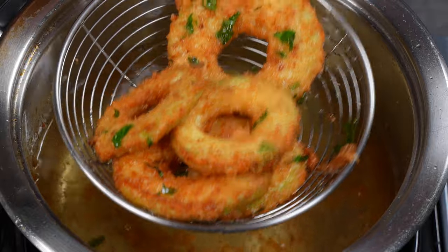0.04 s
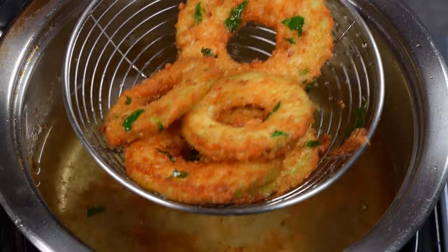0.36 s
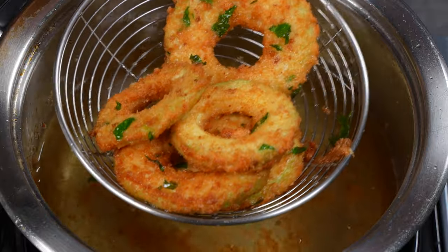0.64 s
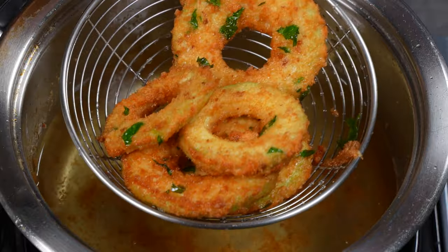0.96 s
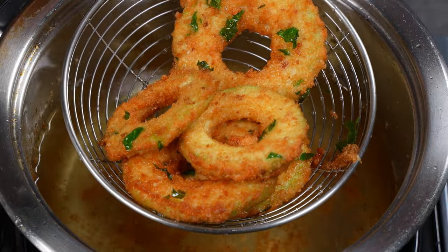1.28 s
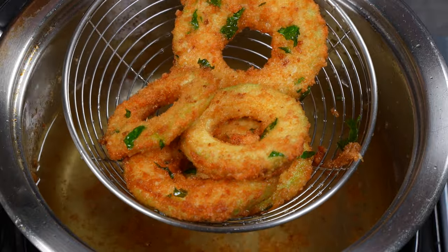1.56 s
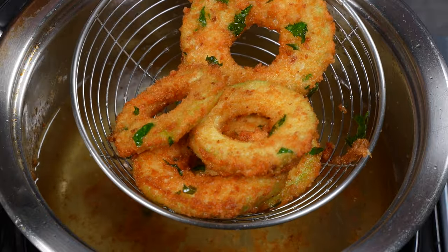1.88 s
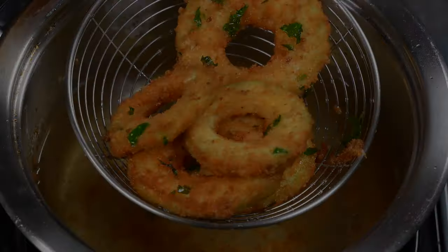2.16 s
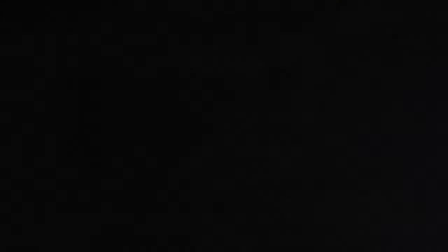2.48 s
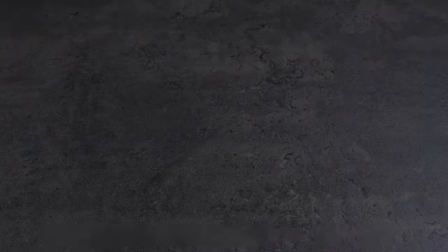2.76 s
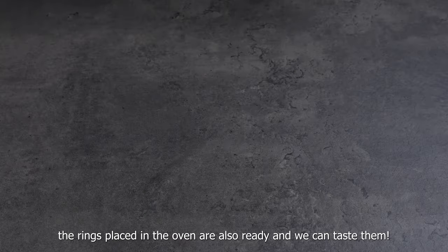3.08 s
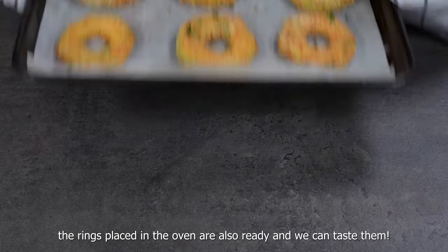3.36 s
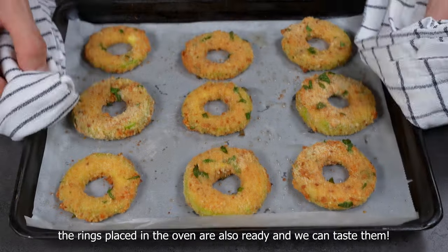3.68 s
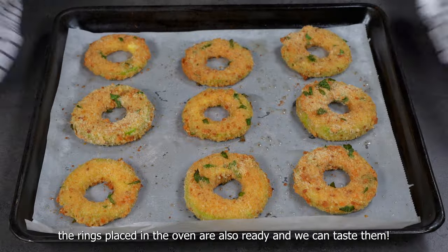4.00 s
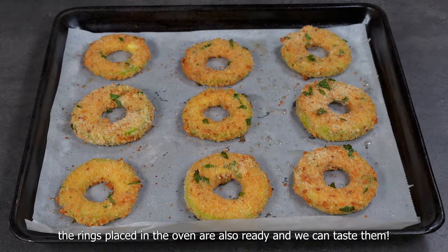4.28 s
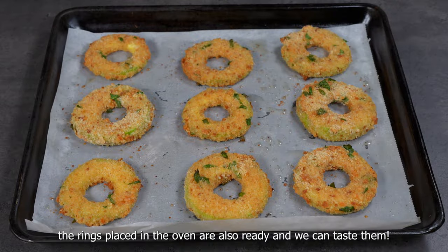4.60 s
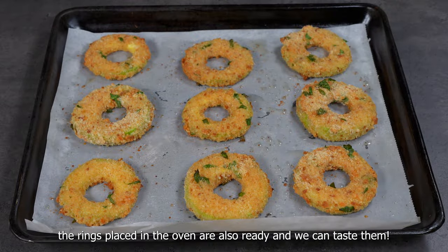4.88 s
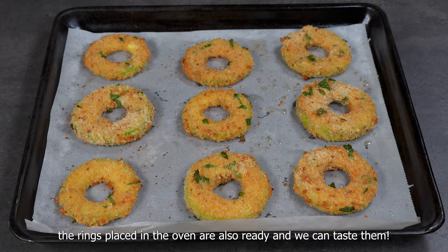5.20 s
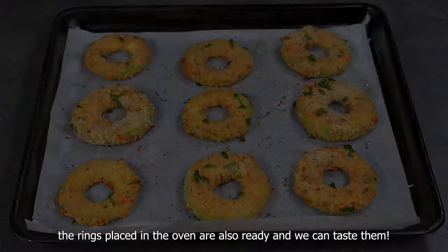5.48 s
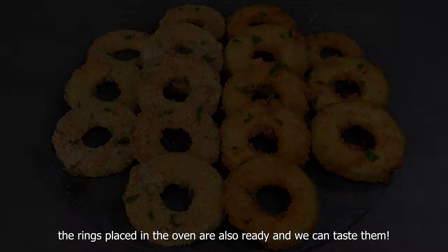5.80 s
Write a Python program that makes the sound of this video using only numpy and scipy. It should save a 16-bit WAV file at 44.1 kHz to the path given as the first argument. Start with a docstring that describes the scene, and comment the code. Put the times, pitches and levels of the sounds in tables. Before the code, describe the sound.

A fine, bright sizzle of frying oil comes first, dotted with pops and tiny pings from the pot. It stops abruptly and a low fan hum is barely heard. After a short paper rustle, a baking tray clangs down on a kitchen worktop, edge first and then flat, close and slightly distorted. Cloth rustles softly and baking paper ticks as the hum sinks away.

```python
"""First, oil fizzes in a steel pot under a lifted skimmer; water drops spit and ring the pot.
At 2.5 s it cuts to a quiet kitchen with a low fan hum. Baking paper crinkles as a lined tray comes
down with towels: one edge hits the counter at 3.7 s, and the tray drops flat a quarter second later.
Both blows overload the close microphone and ring on in the room.
Last, the towels rustle faintly and the hum sinks away."""
import sys
import numpy as np
from scipy import signal
from scipy.fft import rfft, irfft
from scipy.io import wavfile

SR = 44100
rng = np.random.default_rng(int(sys.argv[2]) if len(sys.argv) > 2 else 0)


def log_audio(samples):
    """Write samples as a 16-bit WAV file to the path given in sys.argv[1]."""
    # one column per channel
    frames = np.atleast_2d(samples).T
    # limit to full scale, then quantise
    limited = np.clip(frames, -1, 1)
    pcm = np.round(limited * 32767).astype(np.int16)
    wavfile.write(sys.argv[1], SR, pcm)


N = 266805
TIME = np.arange(N) / SR
CUT_S = 2.459  # from the pot to the kitchen

# Tray hits: (time [s], ring level [dB], flatness [0 edge to 1 flat], crash level [dB])
TRAY_HITS = [(3.7248, -0.5, 0.031, -7), (3.966, 0.5, 0.96, -6.5), (3.9875, -24.5, 0.89, -27),
             (4.0369, -29, 0.4, -27)]
# Ring of the sheet metal: (pitch [Hz], t60 [s], edge-hit level [dB], flat-hit level [dB])
TRAY_MODES = [(97, 0.2, -35, -24), (176.5, 0.25, -29, -19), (251, 0.25, -30.5, -13.5),
              (283, 0.25, -24, -13.5), (322.5, 0.25, -13.5, -17), (366.5, 0.18, -16, -23),
              (453.5, 0.16, -33, -12.5), (630, 0.1, -16.5, -20), (671, 0.14, -16, -9.5),
              (714, 0.2, -21, -21), (752, 0.12, -15, -19), (815, 0.15, -23.5, -23), (907, 0.18, -9.5, -6),
              (962, 0.18, -17.5, -14), (1043, 0.11, -15.5, -20), (1130, 0.058, -15, -34),
              (1203, 0.13, -13.5, -22.5), (1430, 0.12, -14.5, -17), (1488, 0.098, -20.5, -16),
              (1700, 0.22, -21.5, -17.5), (1795, 0.13, -22, -16), (2145, 0.16, -22.5, -27),
              (2283, 0.14, -18.5, -23), (2900, 0.047, -26, -27.5), (3075, 0.19, -21.5, -29.5),
              (4160, 0.12, -31.5, -22), (4460, 0.12, -17, -30), (5130, 0.12, -50, -25.5),
              (5544, 0.11, -34.5, -18.5)]
def tray():
    """Each hit rings one damped sheet: an edge wakes its middle modes, a flat landing the low ones."""
    ringing, crashing = np.zeros(N), np.zeros(N)
    t = np.arange(SR) / SR
    hz, t60, edge_db, flat_db = np.transpose(TRAY_MODES)[:, :, None]
    bloom = 1 - np.exp(-t * (hz / 200) ** 2 / 0.0089)  # slow bends of the whole sheet start late
    counter = undb(-46.5) * np.sin(2 * np.pi * 33 * t) * fade(t, .9)  # the worktop sways under the load
    for s, db, flatness, crash_db in TRAY_HITS:
        polarity = rng.choice([-1, 1], hz.shape)
        gains = polarity * undb(edge_db + flatness * (flat_db - edge_db))
        modes = gains * np.sin(2 * np.pi * hz * t) * bloom * fade(t, t60)
        add(ringing, s, undb(db) * (modes.sum(axis=0) + counter))
        add(crashing, s, undb(crash_db) * crash(flatness))
    return ringing + crashing + kitchen_reverb(undb(-8) * ringing)  # the ring carries less far

# Crash layer: (band [Hz], relative edge-hit level [dB], t60 [s], relative flat-hit level [dB])
CRASH_BANDS = [(30, -21.5, .4, -17.5), (70, -24, .18, -21.5), (129, -27.5, 0.42, -16), (250, -20, 0.22, -7),
               (384, 1, 0.14, -5), (505, -6.5, 0.12, 2), (702.6, 4, 0.13, -5), (1021, 2, .15, -5.5),
               (1390, -4.5, 0.13, -7), (1994, -4.5, 0.072, -2), (3020, -5, 0.088, -7),
               (5470, -12.5, 0.072, -7), (9020, -24, 0.066, -15), (15500, -29, 0.11, -23.5)]
def crash(flatness):
    """The sheet's dense modes blur into a noise burst, and the walls return an even wash."""
    t = np.arange(SR) / SR
    hz, edge_db, t60, flat_db = np.transpose(CRASH_BANDS)
    band_db = edge_db + flatness * (flat_db - edge_db)
    direct = dying_noise(np.column_stack([hz, band_db, t60]))
    send_db = 6.5 + 10 * np.log10(t60)  # a longer crash feeds the room more
    wash_db = band_db + on_log(hz, REVERB_BANDS, 1) + send_db
    wash = dying_noise(np.column_stack([hz, wash_db, on_log(hz, REVERB_BANDS, 2)]))
    wash *= 1 - np.exp(-t / .015)
    return (direct + wash) / direct[:SR // 100].std()

# Kitchen reverb tail: (band [Hz], level [dB], t60 [s])
REVERB_BANDS = [(49.65, -28, .4), (129, -10.5, 0.9), (250, -4.5, 0.85), (480, -12, 0.82), (1010, -12, 0.73),
                (1350, -16.5, .68), (2200, -16.5, .68), (4040, -19, 0.75), (8000, -20.5, .42),
                (15500, -30, .25)]
def kitchen_reverb(x):
    """Hard walls answer a few milliseconds late and hold the low mids longest."""
    response = dying_noise(REVERB_BANDS) / np.sqrt(SR / 20)
    response *= np.clip(np.arange(SR) / SR / 0.0077, 0, 1)
    return signal.fftconvolve(x, response)[:N]

# EQ of the sizzle bed: (frequency [Hz], gain [dB])
FIZZ_EQ = [(50, -35), (160, -12), (320, -12), (460, -10), (550, -1.5), (720, -4.5), (1000, 1), (1400, -9.5),
           (2400, -8.5), (3200, -4), (5400, -5.5), (6700, -3.5), (8000, -5.5), (15500, -7.5)]
def oil_fizz():
    """Thousands of tiny bubbles burst each second; the oil calms with the food lifted out."""
    bubbles = grains(FIZZ_EQ, per_s=14000, spread_db=-1)
    return bubbles * undb(-37 - 0.83 * TIME + 0.3 * drift(12))

# Spit accents: (time [s], peak level [dB], pitch [Hz], pot ring relative to the peak [dB])
SPIT_HITS = [(0.0434, -7, 9200, -14.5), (.1454, -3.5, 9220, -21), (.1824, -5, 9560, -20.5),
             (0.5527, -19, 3740, -20), (0.6529, -13, 3600, -15.5), (0.6533, -15, 7100, -16),
             (.7494, -18, 9100, -3), (.8110, -7, 8220, -17), (1.018, -16, 5970, -20),
             (1.0231, -18, 7930, -17.5), (1.1449, -13.5, 5900, -6.5), (1.1800, -6, 7680, -23.5),
             (1.2380, -12, 4900, -6), (1.2481, -9.5, 6430, -12), (1.371, -21.5, 6900, -19),
             (1.3888, -13.5, 3500, -13.5), (1.3889, -13.5, 6530, -22), (1.4579, -11, 9150, -22),
             (1.955, -14.5, 9020, -14), (2.085, -28, 7240, -18), (2.2244, -5.5, 9600, -27)]
# EQ around a spit: (frequency [multiple of its pitch], gain [dB])
SPIT_EQ = [(.1, -54.5), (0.451, -28), (.7, -19), (.9, -12.5), (1.0, -1), (1.1, -12.5), (1.3, -25.5),
           (2.5, -24)]
# Ping of the steel pot: (pitch [Hz], relative level [dB])
POT_MODES = [(2385, 3.5), (2860, 4.5), (3060, 0.5), (3446, -11), (6730, -5)]
def oil_spits():
    """Water drops burst in the oil, each ringing the pot modes near its pitch."""
    out, t = np.zeros(N), np.arange(SR // 4) / SR
    t60_cycles = 600
    for s, db, hz, ring_db in SPIT_HITS:
        burst = snap(hz, SPIT_EQ, burst_t60=0.0055, tail_db=-13.5, tail_t60=0.04)
        add(out, s - SNAP_ATTACK_S, undb(db) * burst)
        for pot_hz, pot_db in POT_MODES:
            gain = undb(db + ring_db + pot_db + on_log(pot_hz / hz, SPIT_EQ, 1))
            add(out, s, gain * np.sin(2 * np.pi * pot_hz * t) * fade(t, t60_cycles / pot_hz))
    return out

# EQ of the baking paper: (frequency [Hz], gain [dB])
PAPER_EQ = [(150, -51), (250, -13.5), (603, -12), (692, -4.5), (1080, -14), (1310, -5), (1920, -11.5),
            (3160, -9), (15500, -10.5)]
# Paper swells: (peak time [s], level [dB], attack [s], release [s])
PAPER_SWELLS = [(3.413, -63, 0.02, 0.015), (3.595, -47, 0.014, 0.009), (3.623, -41.5, 0.01, 0.041)]
def paper_rustle():
    """The paper shifts on the tray and grows louder as it comes nearer, up to touchdown."""
    touchdown_s = TRAY_HITS[0][0]
    approach = undb(-52.5 - 39 * abs(touchdown_s - TIME)) * until(touchdown_s)
    return grains(PAPER_EQ, per_s=4100, spread_db=1) * np.hypot(approach, swells(PAPER_SWELLS))

# Crinkle accents: (time [s], peak level [dB], pitch [Hz])
CRINKLE_HITS = [(3.443, -48.5, 7000), (3.621, -28.5, 3500), (3.636, -30, 5900), (3.661, -37, 8000),
                (4.557, -40.5, 6000), (4.609, -49.5, 3993), (4.950, -44, 7010), (5.106, -41.5, 5000),
                (5.357, -46, 5040), (5.508, -42, 7930), (5.544, -48, 5000), (5.66, -52, 6000)]
# EQ around a crinkle: (frequency [multiple of its pitch], gain [dB])
CRINKLE_EQ = [(.1, -27), (.4, -19), (1.0, 9.5), (2.5, 3.5)]
def paper_crinkles():
    """The paper crinkles in single bright ticks."""
    out = np.zeros(N)
    for s, db, hz in CRINKLE_HITS:
        tick = snap(hz, CRINKLE_EQ, burst_t60=.008, tail_db=-15.5, tail_t60=.06)
        add(out, s - SNAP_ATTACK_S, undb(db) * tick)
    return out

# EQ of the cloth: (frequency [Hz], gain [dB])
TOWEL_EQ = [(130, -46.5), (220, -15.5), (320, 0.5), (369, -3.5), (473, -2.5), (725, -6.5), (1380, -3),
            (6480, -7.5), (15500, -13.5)]
# Cloth moves: (peak time [s], level [dB], attack [s], release [s])
TOWEL_SWELLS = [(3.728, -22, .002, .03), (3.96, -40, 0.032, 0.067), (4.35, -59.5, .2, 0.32),
                (4.87, -59.5, 0.16, .25), (5.17, -61, 0.0265, 0.072), (5.37, -61.5, 0.052, 0.092),
                (5.54, -58, 0.11, 0.22)]
def towels():
    """Towels rub the rim, slide off and are handled: soft fibre noise with sparse, crisp snags."""
    fibres = grains(TOWEL_EQ, per_s=3300, spread_db=1) * undb(1.2 * drift(30))
    snags = grains(np.array(CRINKLE_EQ) * [7000, 1], per_s=99, spread_db=3.5)
    return (fibres + undb(-14) * snags) * swells(TOWEL_SWELLS) * until(5.745)

# Fan drone: (pitch [Hz], rms level [dB])
FAN_PARTIALS = [(75.4, -72.5), (113.0, -69.5), (150.7, -82), (188.4, -84)]
def fan_hum():
    """A fan's wavering hum enters at the cut and later sinks to a trace."""
    hum = np.zeros(N)
    for hz, db in FAN_PARTIALS:
        amplitude = np.sqrt(2) * undb(db + 0.84 * drift(4.2))
        hum += amplitude * np.sin(2 * np.pi * hz * TIME + .3 * drift(4))
    sink_s, db_per_s, floor_db = 4.63, 90, -23
    return hum * (1 - until(CUT_S)) * undb(np.clip(db_per_s * (sink_s - TIME), floor_db, 0))

# EQ of the room tone: (frequency [Hz], gain [dB])
AIR_EQ = [(15, -43.5), (25, -16.5), (104, -7.5), (133, -9), (160, -10.5), (340, -19), (804, -20.5),
          (1080, -20), (5430, -23.5), (15500, -25.5)]
def room_tone():
    """Faint, steady hiss with a soft low end lies under everything."""
    return undb(-69.5) * unit(equalise(rng.standard_normal(N), AIR_EQ))

SNAP_ATTACK_S = .001
def snap(hz, eq, burst_t60, tail_db, tail_t60):
    """A noise burst around a pitch, trailed by close reflections; peak 1."""
    t = np.arange(SR // 4) / SR
    envelope = fade(t, burst_t60) + undb(tail_db) * fade(t, tail_t60)
    noise = np.roll(rng.standard_normal(len(t)) * envelope, int(SNAP_ATTACK_S * SR))
    burst = equalise(noise, np.array(eq) * [hz, 1])
    burst *= np.minimum(t / SNAP_ATTACK_S, 1) * (t < t[-1] / 2)
    return burst / abs(burst).max()

def grains(eq, per_s, spread_db):
    """Tiny clicks of random timing and size through an EQ; rms 1."""
    sizes = undb(spread_db * np.minimum(rng.exponential(size=N), 6))
    clicks = rng.standard_normal(N) * sizes * (rng.random(N) < per_s / SR)
    return unit(equalise(clicks, eq))

def dying_noise(bands):
    """One second of noise decaying in third octaves; rows are (band [Hz], level [dB], t60 [s])."""
    t = np.arange(SR) / SR
    spectrum = rfft(rng.standard_normal(SR))
    thirds = 3 * np.log2(np.fft.rfftfreq(SR, 1 / SR) / 20 + 1e-9)
    out = 0
    for k in range(31):
        hz = 20 * 2 ** (k / 3)
        band = irfft(spectrum * np.clip(1 - abs(thirds - k), 0, 1), SR)
        out = out + band * undb(on_log(hz, bands, 1)) * fade(t, on_log(hz, bands, 2))
    return out

def swells(rows):
    """Envelope of rubbing moves: each rises and falls exponentially, and their powers add."""
    power = 0
    for s, db, attack_s, release_s in rows:
        away = np.maximum((s - TIME) / attack_s, (TIME - s) / release_s)
        power = power + (undb(db) * np.exp(-away)) ** 2
    return np.sqrt(power)

def drift(per_s):
    """Slow random modulation with a spread near 1."""
    return np.interp(TIME * per_s, np.arange(1024), rng.standard_normal(1024))

def equalise(x, eq):
    """Filter by a curve of (frequency [Hz], gain [dB]) points."""
    hz = np.fft.rfftfreq(len(x), 1 / SR)
    return irfft(rfft(x) * undb(on_log(hz, eq, 1)), len(x))

def on_log(hz, table, column):
    """Read a table column along log frequency."""
    table = np.array(table)
    return np.interp(np.log(hz + 1e-3), np.log(table[:, 0]), table[:, column])

def undb(db):
    """Decibels to gain."""
    return 10 ** (np.asarray(db) / 20)

def unit(x):
    """Scale to rms 1."""
    return x / np.sqrt(np.mean(x ** 2))

def fade(t, t60):
    """Exponential decay, 60 dB down after t60."""
    return np.exp(-np.log(1000) * t / t60)

def until(stop_s):
    """A gate that closes over 2 ms."""
    return np.clip((stop_s - TIME) * 500, 0, 1)

def add(track, s, sound):
    """Mix a sound into a track at a time."""
    i = int(s * SR)
    track[i:i + len(sound)] += sound[:N - i]

def scene():
    """Mono mix: the pot up to the cut, then the tray in the kitchen."""
    pot = (oil_fizz() + oil_spits()) * until(CUT_S)
    foley = tray() + paper_rustle() + towels() + paper_crinkles()
    return (pot + foley + fan_hum() + room_tone())[None]

def record(dry):
    """The tray hits clip at full scale; a steep low-pass trims the top."""
    lowpass = signal.ellip(10, .1, 60, 15650, fs=SR, output="sos")
    return signal.sosfilt(lowpass, np.clip(dry, -1, 1))

dry = scene()
out = record(dry)
log_audio(out)
```